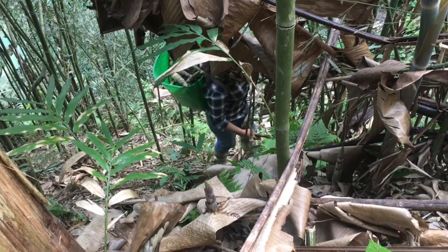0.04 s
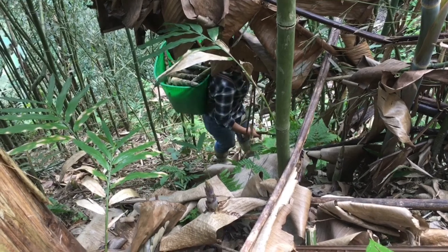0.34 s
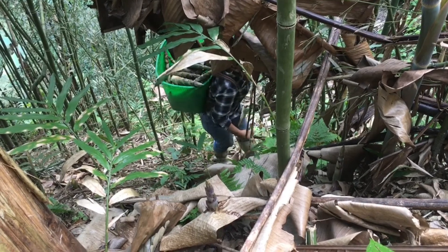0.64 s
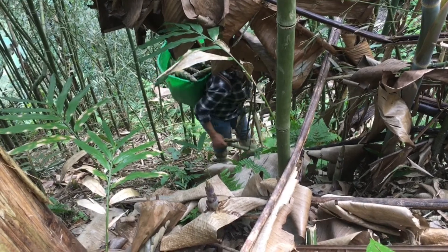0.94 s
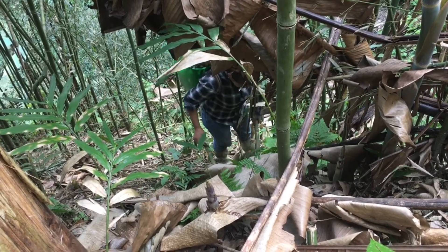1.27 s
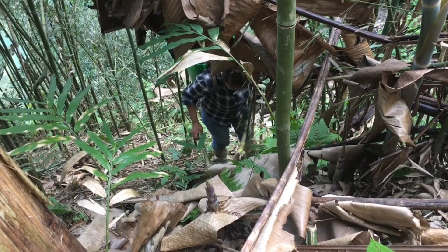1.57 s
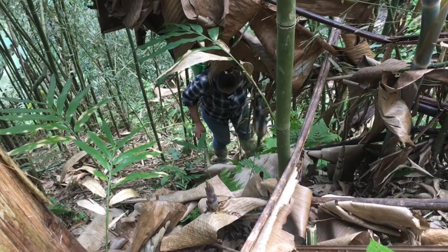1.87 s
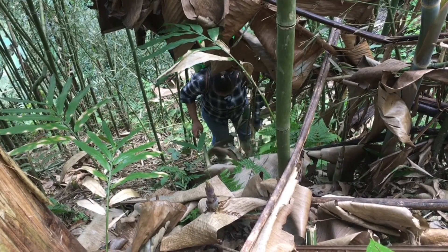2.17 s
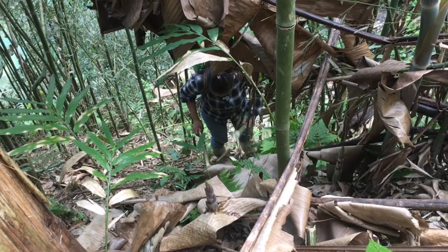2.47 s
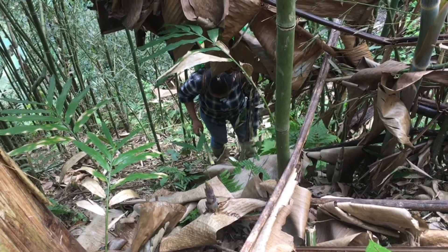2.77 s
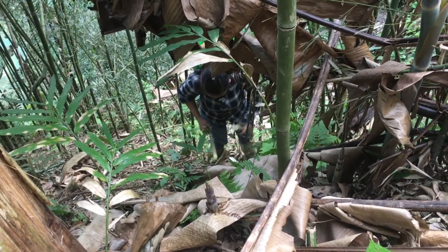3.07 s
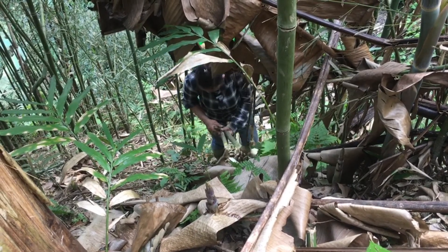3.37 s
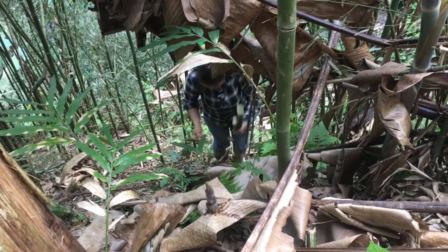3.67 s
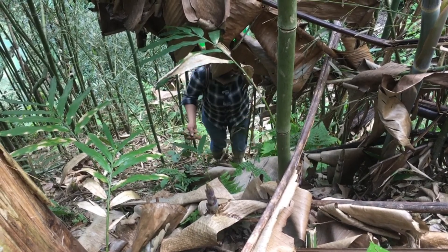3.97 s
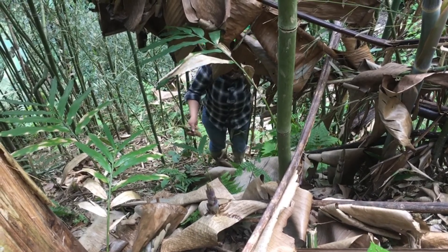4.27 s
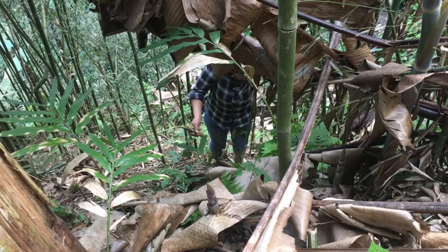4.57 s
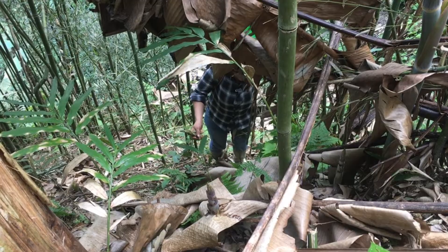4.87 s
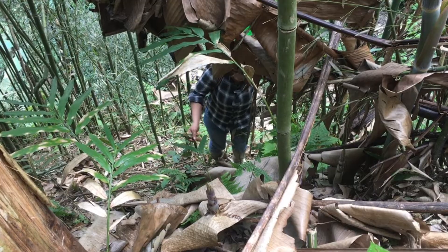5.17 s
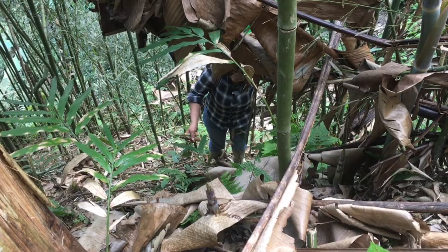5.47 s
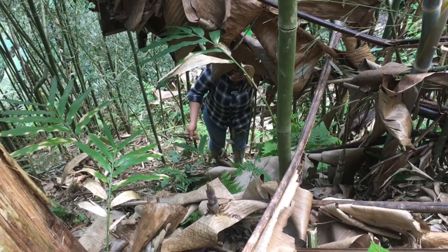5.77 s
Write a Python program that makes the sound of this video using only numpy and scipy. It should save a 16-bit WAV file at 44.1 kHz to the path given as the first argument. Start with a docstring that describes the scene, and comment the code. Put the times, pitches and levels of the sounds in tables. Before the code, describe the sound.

Bamboo shoots thud and crunch into dry leaves, with twig snaps, soft steps and one buzzy bird trill in a quiet grove.

```python
"""Bamboo shoots being gathered in a grove: two are tossed into dry leaves close to the microphone,
where they ring, crunch and thud. A stalk snaps, hollow stems knock, soft steps crackle through the litter.
Off among the stems one bird sweeps its whistle into a buzzy trill, a far one whistles thinly and a
cicada pulses its tymbals. The stems scatter these sounds over a faint forest hush."""
import sys
import numpy as np
from scipy import signal
from scipy.fft import rfft, irfft
from scipy.io import wavfile
from scipy.ndimage import uniform_filter1d

SR = 44100
rng = np.random.default_rng(int(sys.argv[2]) if len(sys.argv) > 2 else 0)


def put_to_file(sound):
    """Save the sound as 16-bit audio at rate SR, in the file named by the first command-line argument."""
    columns = np.atleast_2d(sound).T  # one column per channel
    safe = np.clip(columns, -1, 1)
    whole_steps = np.round(safe * 32767)
    wavfile.write(sys.argv[1], SR, whole_steps.astype(np.int16))


N = 266364
T = np.arange(N) / SR
HIT_T = T[:SR // 4]  # time axis of one blow

# spectrum of dry leaves: f/Hz, level/dB
LEAF_SPECTRUM = [(200, -20), (500, -5), (1000, -1.5), (2000, -3.5), (3500, 0.5), (6000, 1.5), (9000, 1),
                 (12000, -2.5), (15500, -5)]


def landings():
    """Shoots land by the microphone: each contact rings the shoot, crushes leaves, thuds into soil."""
    # contacts with the ground: t/s, ring/dB, crush/dB, thud/dB, pitch ratio of the shoot
    contacts = [(1.991, -56, -34, -44, 1.2), (2.0098, -27, -23.5, -29, 1.01), (2.0166, -19, -39, -27, 0.99),
                (2.0207, -27.5, -31, -34, 0.87), (2.027, -33, -32.5, -49, 1.08),
                (2.107, -50, -58, -67, 1.3), (2.138, -50.5, -43, -64, 1), (2.6939, -32.5, -34, -51, 0.89),
                (2.6995, -28.5, -34, -43, 0.94), (2.742, -44, -48.5, -58, 0.92)]
    # modes of a shoot: f/Hz, level/dB, t60/s
    modes = [(298, -4.5, 0.039), (710, -5, 0.025), (934, 2, 0.037), (1020, -2, 0.024), (1187, -2.5, 0.029),
             (1520, 0.5, 0.013), (1690, -3, 0.043), (1865, 1, 0.026), (1990, -8, 0.033), (2270, -11, 0.046),
             (2406, -6, 0.031), (3130, -7, 0.03), (3390, -11, .035), (3860, -9, .04), (4390, -6, 0.039),
             (6300, -8, 0.028)]
    # spectra of crushed leaves and of the soil below: f/Hz, level/dB
    crush_spectrum = [(150, -6.5), (310, 2), (470, -14.5), (700, 0.5), (1500, -0.5), (3000, -0.5),
                      (6000, -2), (9500, -3), (13000, -7.5), (16000, -11.5)]
    soil_spectrum = [(30, -16), (60, 9), (95, 7), (130, 4.5), (190, -10.5), (250, 1), (320, 2),
                     (450, -23.5), (1000, -36)]
    out, t = np.zeros(N), HIT_T
    for s, ring_db, crush_db, thud_db, pitch in contacts:
        chance = rng.standard_normal((len(modes), 2))
        ring = np.zeros(len(t))
        for (hz, db, t60), (detune, side) in zip(modes, chance):
            mode_hz = hz * pitch * (1 + 0.0061 * detune)
            ring += np.sign(side) * undb(db - 60 * t / t60) * np.sin(2 * np.pi * mode_hz * t)
        # a hard first crunch, then the leaves settle
        settling = undb(-60 * t / 0.019) + undb(-5.5 - 60 * t / 0.24)
        crush = colour(clicks(len(t), 12000, 2.0) * settling, crush_spectrum)
        blow = (t == 0) + 0.012 * rng.standard_normal(len(t)) * undb(-60 * t / 0.05)
        thud = colour(blow, soil_spectrum)
        for db, part in (ring_db, ring), (crush_db, crush), (thud_db, thud):
            add(out, s, undb(db) * attack_unit(part))
    return out


def snaps():
    """Close by, a fibre bundle breaks within milliseconds, coloured by its twig or stalk."""
    # breaks: t/s, relative level/dB, resonance/Hz, t60/s, splintering against resonance/dB
    breaks = [(0.4573, -52, 2620, .012, -8), (.969, -53.5, 6000, 0.018, -6), (1.0696, -53, 5100, .012, 0),
              (1.241, -46.5, 3100, 0.044, -14), (2.147, -43, 6400, 0.016, -18),
              (2.156, -47, 7800, 0.011, -12), (2.2407, -45.5, 3100, 0.022, -7),
              (2.412, -47, 4860, 0.0077, 1), (2.4513, -48, 4580, 0.022, 10),
              (2.528, -48.5, 2100, 0.014, -8), (3.187, -55, 2920, 0.016, -3),
              (3.3451, -46, 3300, 0.0098, 2.5), (3.5599, -52.5, 1830, 0.023, -1.5),
              (3.7325, -27, 2300, 0.012, 8.5)]
    # spectrum of splintering fibres: f/Hz, level/dB
    splinter_spectrum = [(150, -2), (300, 9), (500, -30), (1000, 0), (2000, -5.5), (4500, -4.5), (8500, 2),
                         (12000, -3.5), (16000, -15)]
    out, t = np.zeros(N), HIT_T
    for s, db, hz, t60, splinter_db in breaks:
        crack = rng.standard_normal(len(t)) * undb(-60 * t / t60)
        twig = attack_unit(band(band(crack, hz, 0.7 * hz), hz, hz))
        splinter = undb(splinter_db) * attack_unit(colour(crack, splinter_spectrum))
        # the leaves around the twig shiver for a moment
        leaves = unit(colour(clicks(len(t), 7000, 3.8), LEAF_SPECTRUM))
        shiver = leaves * np.sqrt(t / 0.0091) * undb(-60 * t / 0.13)
        add(out, s, undb(db - 1.4) * (attack_unit(twig + splinter) + undb(-17.0) * shiver))
    return out


def knocks():
    """A dull contact near the microphone rings a hollow stalk for a moment."""
    # knocks on stalks and sheaths: t/s, relative level/dB, f/Hz, nominal ring time/s
    contacts = [(0.351, -45, 890, 0.031), (0.373, -46.5, 934, 0.063), (0.456, -46, 960, 0.061),
                (1.239, -44.5, 1054, 0.048), (1.26, -36, 945, 0.042), (2.526, -53, 970, 0.016),
                (2.679, -30, 1594, 0.048), (4.099, -48, 1110, 0.03), (4.321, -40, 640, 0.02),
                (4.324, -35.5, 537, 0.017), (4.727, -46, 1060, 0.025), (4.879, -45, 730, 0.029),
                (5.181, -42.5, 1060, 0.023), (5.699, -47.5, 572, 0.046), (5.893, -50, 1020, 0.034),
                (5.966, -49, 1130, 0.027)]
    out, t = np.zeros(N), HIT_T
    for s, db, hz, ring_s in contacts:
        # leaves cushion the contact, so it builds over a few milliseconds
        fade = undb(-60 * t / (1.36 * ring_s)) * (1 - np.exp(-t / .0007))
        contact = rng.standard_normal(len(t)) * fade
        wall = attack_unit(band(band(contact, hz, 0.59 * hz), hz, 4.3 * hz))
        hollow = attack_unit(np.sin(2 * np.pi * hz * t) * fade)
        add(out, s, undb(db - 11.0) * (wall + 0.99 * hollow))
    return out


def steps():
    """Soft ground gives under a foot: a few low cycles that sink in pitch as the weight arrives."""
    # thumps of feet: t/s, relative level/dB, nominal f/Hz, time scale/s
    thumps = [(2.991, -50.5, 261, 0.012), (4.04, -55, 188, 0.023), (4.142, -47, 144, 0.025),
              (4.324, -43.5, 202, 0.021), (4.537, -37, 161, 0.0084), (4.735, -46, 195, 0.036),
              (4.776, -38.5, 145, 0.014), (4.854, -48, 160, 0.019), (4.884, -46.5, 201, 0.03),
              (5.138, -52.5, 156, 0.015), (5.545, -45, 189, 0.032), (5.582, -40, 135, 0.019)]
    out, t = np.zeros(N), HIT_T
    for s, db, hz, length in thumps:
        age = 2.32 * t / length
        push = age ** 2 * np.exp(2 * (1 - age))
        sinking_hz = hz * (0.75 + 0.47 * np.exp(-t / length))
        scuff = unit(band(band(rng.standard_normal(len(t)), hz, hz), hz, hz))
        add(out, s, undb(db - 1.5) * push * (tone(sinking_hz) + 0.2 * scuff))
    return out


def litter(press_s=0.039, mat_hz=243):
    """Stirred leaves crackle and slide; heavier stirring flexes stiff sheaths and the packed leaf mat."""
    # leaves that keep shifting, fewer once the gatherer stands up: t/s, level/dB
    restless = [(0, -72.5), (2.6, -77.5), (4.0, -81), (6.04, -81)]
    # an arm or shoot sweeps the leaves: peak t/s, level/dB, build/s, settle/s, body against leaves/dB
    sweeps = [(.08, -67.5, .2, 0.27, 2.5), (.47, -68, 0.17, 0.11, 0), (.99, -66.5, 0.21, .03, -17),
              (1.55, -61, 0.36, .08, -18), (1.67, -68, 0.075, .05, -18), (1.87, -67.5, 0.21, 0.057, -8),
              (1.99, -50, 0.047, 0.081, -14), (2.14, -59.5, 0.046, .25, -0.5), (2.37, -59, 0.11, 0.11, -8),
              (2.455, -62.5, 0.036, 0.045, 1.5), (2.79, -65.5, 0.22, 0.23, -1.5),
              (3.08, -73, 0.31, 0.24, 3.5), (3.44, -68.5, 0.11, 0.085, -8), (3.71, -62, 0.15, 0.12, 1.5),
              (3.855, -65.5, 0.037, 0.042, -19), (4.9, -68.5, 0.091, 0.13, 0)]
    # feet pressing into the litter: peak t/s, level/dB, settle/s, body against leaves/dB
    footfalls = [(.62, -61, 0.067, -23), (4.089, -64, .42, -3), (4.73, -68.5, 0.056, 5),
                 (5.05, -71.5, 0.031, 1), (5.135, -65.5, 0.11, 1), (5.35, -72.5, 0.14, -5),
                 (5.554, -68.5, 0.13, 1.5), (5.92, -68.5, 0.058, 6.5)]
    leaf_power = undb(curve(restless)) ** 2
    body_power = leaf_power * undb(-7) ** 2  # the body is the sheaths and the mat
    presses = [(s, db, press_s, settle, body_db) for s, db, settle, body_db in footfalls]
    for s, db, build, settle, body_db in list(sweeps) + presses:
        # the power grows tenfold over the build time and falls tenfold over the settling time
        power = undb(db - 10 * np.maximum((s - T) / build, (T - s) / settle)) ** 2
        leaf_power += power
        body_power += power * undb(body_db) ** 2
    crackle = undb(-3.5) * unit(colour(clicks(N, 900, 1.8), LEAF_SPECTRUM))
    slide = unit(colour(rng.standard_normal(N), LEAF_SPECTRUM)) * undb(-0.6 + 3.2 * walk(55))
    sheaths = unit(band(clicks(N, 700, 2.5), 1100, 1800))
    mat = undb(-6) * unit(band(band(rng.standard_normal(N), mat_hz, mat_hz), mat_hz, mat_hz))
    return np.sqrt(leaf_power) * (crackle + slide) + np.sqrt(body_power) * (sheaths + mat)


def trill(attack_s=0.095, release_s=0.036, warble_start_hz=109, warble_end_hz=78, slowing_s=.115):
    """A bird among the stems sweeps a whistle so fast that it buzzes, loudest at the throat resonance."""
    # the pitch dips and climbs back: t/s, nominal f/Hz
    contour = [(1.138, 5970), (1.17, 5190), (1.249, 4814), (1.351, 5210), (1.469, 5574), (1.516, 5540)]
    # response of throat and beak: f/Hz, gain/dB
    throat = [(2000, -39), (3300, -7), (4200, -12.5), (5300, -1.5), (6000, -4), (6700, -3.5), (7400, -17),
              (8700, 1.5), (10400, -14.5), (11400, -10.5), (12800, -17), (14200, -12), (16000, -27)]
    age, left = np.maximum(T - contour[0][0], 0), contour[-1][0] - T
    effort = np.sqrt(ramp(age, attack_s)) * ramp(left, release_s) * undb(-29.8 - 6 * age)
    warble_hz = warble_end_hz + (warble_start_hz - warble_end_hz) * np.exp(-age / slowing_s)
    warble = tone(warble_hz * (age > 0) * (1 + 0.012 * walk(60)))
    # the sweeps have round tops and quick dips of uneven depth
    sweep_hz = 830 * warble - 170 * warble ** 2 + 130 * walk(120) * np.minimum(warble, 0)
    hz = curve(contour) + 70 + sweep_hz + 60 * walk(700)
    whistle = tone(hz) + undb(-17.5) * tone(2 * hz) + undb(-18) * tone(3 * hz)
    rasp = undb(-21.5) * rng.standard_normal(N)
    return colour(effort * undb(0.33 * walk(83)) * (whistle + rasp), throat)


def cicada(click_hz=197, period_s=.1038, rise_s=.035, stop_s=0.014, warm_up_s=0.73):
    """Off in the grove, tymbal clicks ring a cicada's body: chirps on an even beat, then a held note."""
    # body resonances: f/Hz, width/Hz, level/dB
    body = [(2620, 380, -4), (3210, 360, -8.5), (4594, 350, 0), (5100, 660, -9.5), (5670, 340, -8)]
    # phrases: start t/s, held note t/s, end t/s, relative level/dB
    phrases = [(-.59, 0.47, 0.65, -64.5), (1.648, 2.65, 2.72, -64.5), (3.373, 4.617, 4.77, -65.5),
               (5.616, 5.86, 6.8, -64.5)]
    cycle = np.cumsum(click_hz * (1 + .006 * walk(15))) / SR % 1
    tymbal = np.exp(-cycle / .18)
    song = unit(sum(undb(db) * band(band(tymbal * rng.standard_normal(N), hz, width), hz, 2 * width)
                    for hz, width, db in body))
    effort = np.zeros(N)
    for start, held, end, db in phrases:
        cold = 1 - ramp(T - start, warm_up_s)  # the first chirps are weaker and shorter
        left = (start - T) % period_s
        length = period_s * (.76 - 0.23 * cold)
        chirps = ramp(length - left, rise_s) * ramp(left, stop_s) * (T > start) * (T < held)
        note = ramp(T - held, rise_s) * ramp(end - T, stop_s)
        effort += undb(db - 1.5 * cold) * (chirps + note)
    return undb(2.5) * effort * song


def whistles():
    """A far bird whistles thin, level notes that flutter slightly."""
    # notes: t/s, length/s, f/Hz, relative level/dB
    notes = [(4.41, 0.11, 5050, -69), (4.72, 0.14, 4760, -65), (5.034, 0.1, 4860, -77),
             (5.19, .06, 4530, -63.5), (5.263, 0.03, 4480, -57), (5.31, 0.032, 4480, -58.5),
             (5.37, 0.15, 4580, -67)]
    out = np.zeros(N)
    for s, length, hz, db in notes:
        swell = np.sin(np.pi * np.clip((T - s) / length, 0, 1))
        out += undb(db - 1.0 + 3.7 * walk(55)) * swell * tone(hz + 40 * walk(260))
    return out


def forest(fade_s=0.066):
    """The distance: an even hush of foliage, far insects and a low drone that wavers a little."""
    # spectrum of the hush: f/Hz, level/dB
    hush_spectrum = [(18, -21), (30, 1.5), (120, 0.5), (332, -4), (492, -8), (1050, -4), (1260, -11),
                     (2070, -16), (3590, -17), (4910, -24), (6720, -23.5), (7650, -46), (9430, -34),
                     (15500, -39)]
    # swells of the insect chorus: start t/s, end t/s, level/dB
    swells = [(-.2, 0.37, -76), (.3, 4.5, -82), (4.99, 5.16, -67.5), (5.37, 5.9, -68)]
    # course of the drone: t/s, level/dB
    drone_levels = [(0, -66.5), (.9, -71.5), (1.5, -61), (2.4, -68.5), (3.5, -58.5), (4.6, -69.5),
                    (6.04, -71.5)]
    hush = unit(colour(rng.standard_normal(N), hush_spectrum)) * undb(-62.0 + .5 * walk(4.87))
    swell = sum(undb(db) * ramp(np.minimum(T - start, end - T), fade_s) for start, end, db in swells)
    insects = unit(band(band(rng.standard_normal(N), 5140, 1200), 5140, 1200))
    chorus = insects * swell * undb(1.3 * walk(40))
    drone = tone(87.3 + 1.495 * walk(4.5)) * undb(curve(drone_levels) + 2.0 * walk(12))
    return hush + chorus + drone


def grove(x, near_db, far_db, near_t60=0.14, far_t60=0.56):
    """Add quick echoes from the nearest stems, then a faint tail from the depth of the grove."""
    t = T[:SR]
    near = rng.standard_normal(SR) * undb(-60 * t / near_t60) * (t > .0007)
    scatter = colour(rng.standard_normal(SR), [(100, 7), (1000, 0), (6000, 0.5), (14000, -17.5)])
    far = scatter * undb(-60 * t / far_t60) * (1 - np.exp(-t / 0.0093))
    echoes = (undb(near_db) * unit(near) + undb(far_db) * unit(far)) / np.sqrt(SR)
    return x + signal.fftconvolve(x, echoes)[:N]


def undb(db):
    """Decibels to gain."""
    return 10 ** (np.asarray(db) / 20)


def unit(x):
    """Scale to rms 1."""
    return x / np.sqrt(np.mean(x ** 2) + 1e-18)


def attack_unit(x):
    """Scale so that the loudest three milliseconds have rms 1."""
    return x / np.sqrt(uniform_filter1d(x ** 2, size=132).max() + 1e-18)


def curve(points):
    """A curve in time through (t/s, value) points."""
    return np.interp(T, *np.transpose(points))


def ramp(s, length):
    """Rises from 0 to 1 as s goes from 0 to length."""
    return np.clip(s / length, 0, 1)


def tone(hz):
    """A sine that follows a changing frequency."""
    return np.sin(2 * np.pi * np.cumsum(hz) / SR)


def add(out, s, x):
    """Mix x into out from time s."""
    start = int(s * SR)
    out[start:start + len(x)] += x[:N - start]


def band(x, hz, width):
    """One resonance, gain 1 at its centre."""
    return signal.lfilter(*signal.iirpeak(hz, hz / min(width, SR / 4), fs=SR), x)


def colour(x, points, size=4096):
    """Minimum-phase filter through (f/Hz, gain/dB) points."""
    hz, db = np.transpose(points)
    bin_hz = np.arange(size // 2 + 1) * SR / size
    log_gain = np.log(undb(np.interp(np.log(bin_hz + 1), np.log(hz), db)))
    cepstrum = irfft(log_gain)[:size // 2]
    cepstrum[1:] *= 2
    return signal.fftconvolve(x, irfft(np.exp(rfft(cepstrum, size))))[:len(x)]


def walk(rate):
    """Random wander of rms 1, with rate turns a second."""
    hold = int(SR / rate)
    stairs = np.repeat(rng.standard_normal(N // hold + 1), hold)
    return unit(uniform_filter1d(stairs, hold)[:N])


def clicks(n, rate, spread_db):
    """Random fractures, about rate a second: many small, a few large."""
    size = undb(spread_db * np.minimum(rng.exponential(size=n), 4))
    return unit((rng.random(n) < rate / SR) * size * rng.choice([-1, 1], n))


def scene():
    """One microphone by the gatherer: near blows are fairly dry, the animals come through many stems."""
    blows = grove(landings() + knocks() + steps(), near_db=-13.5, far_db=-22.5)
    twigs = grove(snaps(), near_db=-12.5, far_db=-18.5)
    leaves = grove(litter(), near_db=-4, far_db=-13)
    bird = grove(trill(), near_db=-2, far_db=-12, near_t60=.07, far_t60=.55)
    insect = grove(cicada(), near_db=-9, far_db=-17)
    far_bird = grove(whistles(), near_db=-13, far_db=-6.5)
    return (blows + twigs + leaves + bird + insect + far_bird + forest())[None]


def record(dry):
    """The microphone sheds the deepest rumble and the recorder cuts the top."""
    low_cut = signal.butter(5, 38, "high", fs=SR, output="sos")
    high_cut = signal.ellip(10, .2, 80, 15850, fs=SR, output="sos")
    return signal.sosfilt(high_cut, signal.sosfilt(low_cut, dry))


dry = scene()
out = record(dry)
put_to_file(out)
```